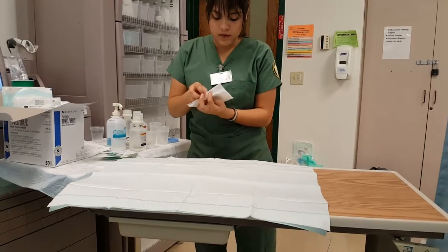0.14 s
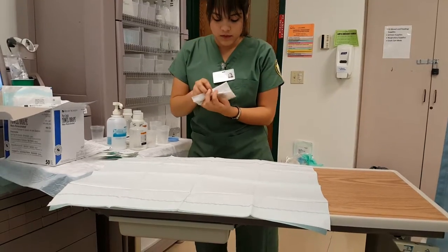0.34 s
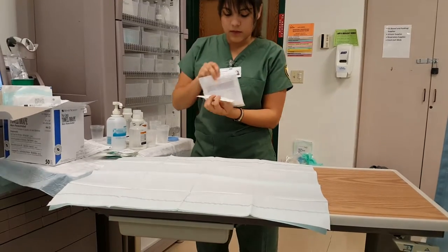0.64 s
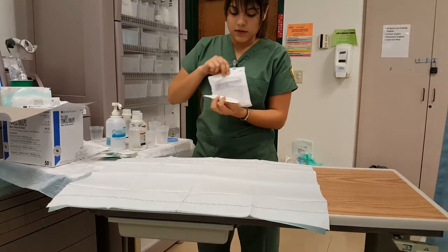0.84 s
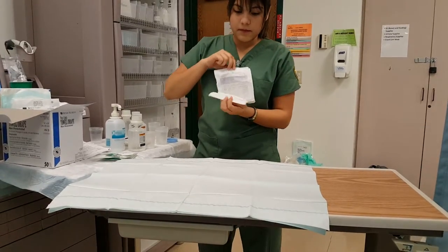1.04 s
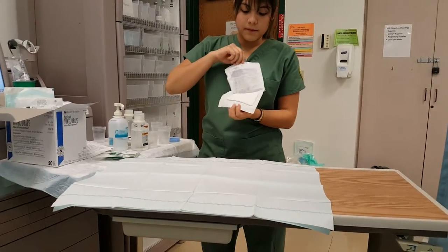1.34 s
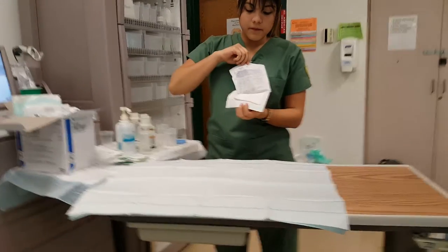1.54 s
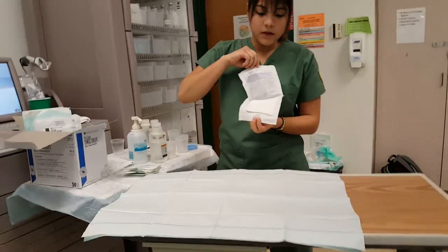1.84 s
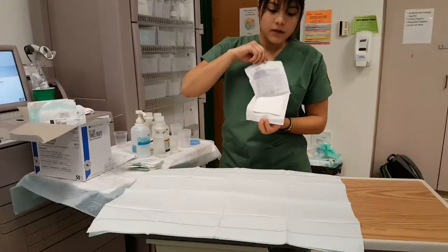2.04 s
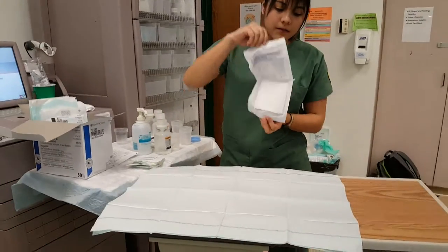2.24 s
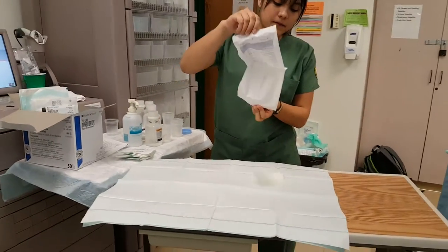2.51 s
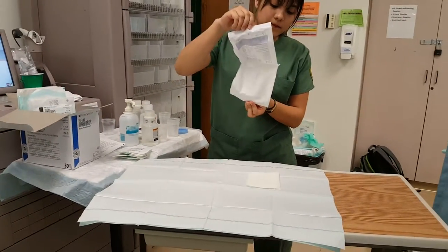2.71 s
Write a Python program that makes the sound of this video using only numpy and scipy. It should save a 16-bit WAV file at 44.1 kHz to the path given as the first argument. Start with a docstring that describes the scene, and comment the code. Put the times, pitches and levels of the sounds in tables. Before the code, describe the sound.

A paper packet is peeled open with fine crinkling, glue ticks and sharp crease snaps in bursts, then its light contents drop softly onto a covered table; small room, faint ventilation, stereo microphone a couple of metres away.

```python
"""Small room, a couple of metres from a covered table: a paper packet is peeled open by hand.
Creases snap as noise bursts with facet rings; glue parts in thin ticks; panels flex as decaying noise.
Clumped sine grains and noise make the fine crinkle; the contents land as a low decaying sine plus rustle.
Filtered noise and wavering sines make the ventilation; random echoes and a short tail make the room."""
import sys
import numpy as np
from scipy import signal
from scipy.fft import rfft, irfft, next_fast_len
from scipy.io import wavfile
from scipy.ndimage import map_coordinates

SR = 44100
rng = np.random.default_rng(int(sys.argv[2]) if len(sys.argv) > 2 else 0)


def unload_audio(sound):
    """Save the sound as a 16-bit wav file, at the path given as the first command line argument."""
    columns = np.transpose(np.atleast_2d(sound))
    # keep every value between -1 and 1, then stretch to whole-number steps
    steps = np.round(np.clip(columns, -1, 1) * 32767)
    wavfile.write(sys.argv[1], SR, steps.astype(np.int16))


N = 126567
TOP_HZ = 16000


def amp(db):
    """Amplitude factor of a level in dB."""
    return 10 ** (np.asarray(db) / 20)


def unit(x):
    """Scale to rms 1 over all channels."""
    return x / np.sqrt(np.mean(x ** 2) + 1e-20)


def along(points, hz):
    """Interpolate (hz, value) points on a log frequency axis."""
    point_hz, value = np.transpose(points)
    return np.interp(np.log(hz + 1), np.log(point_hz + 1), value)


def curve(points):
    """Interpolate (time_s, value) points, one value per sample."""
    return np.interp(np.arange(N) / SR, *np.transpose(points))


def wobble(knots_per_s):
    """Smooth random curve through normally distributed knots."""
    knots = rng.standard_normal(int(N * knots_per_s / SR) + 4)
    return map_coordinates(knots, [np.arange(N) * knots_per_s / SR])


def low_shelf(hz, corner_hz):
    """1 below the corner, 0 above."""
    return 1 / (1 + (hz / corner_hz) ** 4)


def high_shelf(hz, corner_hz):
    """0 below the corner, 1 above."""
    return 1 - 1 / (1 + (hz / corner_hz) ** 6)


def coloured(x, db_at):
    """Causal minimum-phase filter with gain db_at(hz), built by folding the cepstrum."""
    n = x.shape[-1]
    m = 2 * next_fast_len(n)
    gain = amp(db_at(np.fft.rfftfreq(m, 1 / SR)))
    cepstrum = irfft(np.log(gain + 1e-6), m)
    cepstrum[..., 1:m // 2] *= 2
    cepstrum[..., m // 2 + 1:] = 0
    response = np.exp(rfft(cepstrum))
    return irfft(rfft(x, m) * response, m)[..., :n]


def stereo(pair, width):
    """Left and right from two unrelated signals taken as mid and side."""
    mid = pair[0]
    side = coloured(pair[1], lambda hz: along(width, hz))
    return np.array([mid + side, mid - side])


def add(track, start_s, sound):
    """Mix a sound into the track, cut at the track's end."""
    i = max(0, round(start_s * SR))
    part = track[:, i:i + sound.shape[1]]
    part += sound[:, :part.shape[1]]


# air noise spectrum, relative: hz, density_db_per_hz
AIR_SPECTRUM = [(15, -26), (30, -15), (56, -3), (80, -4), (120, 2), (190, 0), (310, -8.5), (480, -12),
                (610, -19.5), (730, -13), (1000, -23.5), (2500, -29.5), (6000, -40), (15500, -46.5)]
# air stereo width: hz, side_over_mid_db
AIR_WIDTH = [(60, -16.5), (150, -17), (320, -8.5), (3000, 1.5)]
# fan and motor lines: pitch_hz, level_db
HUM_LINES = [(117, -52), (240, -61.5), (273, -65), (541, -60)]
AIR_DB = -48.5
HUM_WAVER_DB, HUM_DRIFT_HZ = 1.5, 2.23


def ventilation():
    """Duct rumble and faint hiss, with slightly unsteady fan and motor lines."""
    noise = stereo(rng.standard_normal((2, N)), AIR_WIDTH)
    air = unit(coloured(noise, lambda hz: along(AIR_SPECTRUM, hz)))
    hum = np.zeros(N)
    for pitch_hz, level_db in HUM_LINES:
        level = amp(level_db + HUM_WAVER_DB * wobble(4.83))
        cycles = np.cumsum(pitch_hz + HUM_DRIFT_HZ * wobble(6)) / SR
        hum += level * np.sqrt(2) * np.sin(2 * np.pi * cycles)
    return amp(AIR_DB) * air + hum


# tail colour: hz, gain_db
ROOM_COLOUR = [(200, 0), (2000, -4), (6000, -12.5), (15000, -7.5)]
ROOM_T60_S, ROOM_ONSET_S = 0.2, 0.0026
EARLY_DB, EARLY_DECAY_S = -9.5, 0.012


def room_response(size=256):
    """Early echoes from table and cabinets, then a short, dull tail."""
    hz, time_s, z = signal.stft(rng.standard_normal((2, SR // 2)), SR, nperseg=size)
    gain = amp(along(ROOM_COLOUR, hz))[:, None] * np.sqrt(2 * np.log(1000) / (ROOM_T60_S * SR))
    decay = amp(-60 * time_s / ROOM_T60_S)
    tail = signal.istft(z * gain * decay, SR, nperseg=size)[1]
    t = np.arange(tail.shape[1]) / SR
    onset = 1 - np.exp(-(t / ROOM_ONSET_S) ** 2)
    spiky = rng.standard_normal(tail.shape) ** 3  # cubing makes a few echoes stand out
    early = spiky * onset * np.exp(-t / EARLY_DECAY_S)
    early /= np.linalg.norm(early, axis=1, keepdims=True)
    return onset * tail + amp(EARLY_DB) * early


def room(x, count=14):
    """Echoes of the paper; the pattern is redrawn for each equal stretch as the hands move."""
    out = np.zeros((2, N))
    for part in np.array_split(np.arange(N), count):
        echoes = signal.fftconvolve(x[:, part], room_response(), axes=1)
        add(out, part[0] / SR, echoes)
    return out


# paper colour, relative: hz, density_db_per_hz
PAPER_SPECTRUM = [(100, -22), (300, -6.5), (520, -6.5), (780, 0), (1200, -5.5), (1600, -2.5), (2200, 0.5),
                  (2800, -4), (3500, -0.5), (4600, -3), (5700, -2.5), (7500, -7.5), (10000, -8),
                  (15500, -16)]


def paper_db(hz):
    """Spectral colour of noise from the stiff sheet."""
    return along(PAPER_SPECTRUM, hz)


# packet stereo width: hz, side_over_mid_db
PAPER_WIDTH = [(300, -21.5), (1500, -9.5), (5000, -6), (15000, -5)]


def paper_stereo(pair):
    """Spread two unrelated signals over the packet's stereo width."""
    return stereo(pair, PAPER_WIDTH)


LAND_START_S, LAND_RISE_S, LAND_DECAY_S = 2.592, 0.0034, 0.02
PUSH_HZ, PUSH_DB, LAND_RUSTLE_DB = 128, -38, -43.5  # levels before the envelope


def landing():
    """The flat, light contents push out a puff of air and brush the table cover."""
    t = np.maximum(np.arange(N) / SR - LAND_START_S, 0)
    shape = (1 - np.exp(-t / LAND_RISE_S)) * np.exp(-t / LAND_DECAY_S)
    push = np.sin(2 * np.pi * PUSH_HZ * t)
    rustle = unit(coloured(paper_stereo(rng.standard_normal((2, N))), paper_db))
    return shape * (amp(PUSH_DB) * push + amp(LAND_RUSTLE_DB) * rustle)


# crinkle level under the fingers: time_s, level_db
CRINKLE_LEVEL = [(0, -52.5), (.13, -52), (.3, -58.5), (.45, -52), (.57, -58), (.68, -60), (.78, -55.5),
                 (.98, -53), (1.05, -69), (1.24, -57.5), (1.36, -40.5), (1.46, -81), (2.1, -62),
                 (2.26, -58), (2.33, -43.5), (2.47, -80)]
CRINKLES_PER_S, CRINKLE_SPREAD_DB, CLUMP_DB = 600, 6.5, 3.5
CRINKLE_HZ, CRINKLE_SPREAD_OCTAVES, CRINKLE_DECAY_CYCLES = 2350, 0.55, 3.2
FIZZ_DB = -2  # against the facets


def crinkle(size=512):
    """Tiny facets flick in clumps, each with its own brief pitch, over the fizz of parting fibres."""
    hits = np.flatnonzero(rng.random(N) < CRINKLES_PER_S / SR)
    pitch, strength, mid, side = rng.standard_normal((4, len(hits), 1))
    hz = np.clip(CRINKLE_HZ * 2 ** (CRINKLE_SPREAD_OCTAVES * pitch), None, TOP_HZ)
    cycles = hz * np.arange(size) / SR
    level = amp(CRINKLE_SPREAD_DB * 2 * np.tanh(strength / 2))
    grains = level * np.sin(2 * np.pi * cycles) * np.exp(-cycles / CRINKLE_DECAY_CYCLES)
    where = (hits[:, None] + np.arange(size)).ravel()
    # random polarity in mid and side scatters the grains between left and right
    facets = np.array([np.bincount(where, (grains * np.sign(w)).ravel(), N + size)[:N]
                       for w in (mid, side)])
    flutter = amp(CRINKLE_SPREAD_DB * wobble(400))
    fizz = coloured(rng.standard_normal((2, N)) * flutter, paper_db)
    clumps = amp(CLUMP_DB * np.tanh(wobble(70.42)))
    texture = paper_stereo(unit(facets) + amp(FIZZ_DB) * unit(fizz))
    return amp(curve(CRINKLE_LEVEL)) * unit(clumps * texture)


# freed panels: start_s, level_db (before the decay)
PANEL_FLEXES = [(1.105, -47), (1.206, -37.5)]
FLEX_HZ, FLEX_HALF_WIDTH_OCTAVES, FLEX_DECAY_S = 1600, 0.7, 0.018


def flex_band_db(hz):
    """Midrange band-pass."""
    octaves = np.log2((hz + 1) / FLEX_HZ)
    return -10 * np.log10(1 + (octaves / FLEX_HALF_WIDTH_OCTAVES) ** 8)


def flexes(size=8192):
    """A panel straightens after its crease has snapped: a ragged midrange rustle that dies away."""
    out, t = np.zeros((2, N)), np.arange(size) / SR
    for start_s, level_db in PANEL_FLEXES:
        raggedness = amp(CLUMP_DB * wobble(CRINKLES_PER_S)[:size])
        ragged = rng.standard_normal((2, size)) * raggedness
        rustle = unit(coloured(paper_stereo(ragged), flex_band_db))
        add(out, start_s, amp(level_db) * np.exp(-t / FLEX_DECAY_S) * rustle)
    return out


ATTACK_S, TREBLE_HZ = 0.00048, 7060
LEVEL_WINDOW_S = 0.0042  # tick and snap levels: rms with all energy packed into this time


def burst_db(hz, treble_db):
    """Paper colour with more or less treble."""
    return paper_db(hz) + treble_db * high_shelf(hz, TREBLE_HZ)


def at_level(x, level_db):
    """Scale a short burst so its energy gives level_db over LEVEL_WINDOW_S."""
    return amp(level_db) * unit(x) * np.sqrt(LEVEL_WINDOW_S * SR / x.shape[-1])


# glued seam: start_s, level_db, extra_treble_db
GLUE_TICKS = [(0.0235, -43, 3), (0.0325, -42, 4), (0.139, -43.5, 3), (0.1823, -43, 4), (0.245, -40.5, 9),
              (0.2585, -41.5, 2), (0.326, -45, 12), (0.3483, -44, -4), (0.4475, -43, 5), (0.465, -43, 4),
              (0.629, -46.5, -20), (0.7444, -44.5, -16), (0.7737, -43, -16), (0.875, -43.5, 4),
              (0.945, -44, -12), (1.2175, -40.5, -8), (1.2475, -43, -16), (1.2655, -38, 4),
              (1.307, -39.5, 0), (2.027, -48.5, -15), (2.22, -44.5, -20), (2.3825, -43.5, 1),
              (2.4238, -39.5, 5), (2.524, -49.5, -11)]
TICK_DECAY_S, TICK_LOW_HZ, TICK_LOW_DB = 0.0013, 850, -20
TICK_DULL_HZ, TICK_DULL_DB = 3100, -4  # the soft glue damps the upper range


def tick_thinning_db(hz):
    """Bass cut and glue damping."""
    return TICK_DULL_DB * high_shelf(hz, TICK_DULL_HZ) + TICK_LOW_DB * low_shelf(hz, TICK_LOW_HZ)


def ticks(size=1024):
    """Each spot of glue parts with a thin click that rings nothing."""
    out, t = np.zeros((2, N)), np.arange(size) / SR
    shape = (1 - np.exp(-t / ATTACK_S)) * np.exp(-t / TICK_DECAY_S)
    for start_s, level_db, treble_db in GLUE_TICKS:
        noise = paper_stereo(shape * rng.standard_normal((2, size)))
        tick = coloured(noise, lambda hz: burst_db(hz, treble_db) + tick_thinning_db(hz))
        add(out, start_s, at_level(tick, level_db))
    return out


RING_DB, RING_DECAY_S = -7, 0.0022  # level against the burst, at CRINKLE_HZ
RING_DB_PER_OCTAVE = 1.6  # small, high facets radiate better


def facet(hz, t):
    """Brief ring of one flipping facet, against a burst of rms 1."""
    shape = (1 - np.exp(-t / ATTACK_S)) * np.exp(-t / RING_DECAY_S)
    ring = shape * np.sin(2 * np.pi * (hz * t + rng.random()))
    return amp(RING_DB + RING_DB_PER_OCTAVE * np.log2(hz / CRINKLE_HZ)) * unit(ring)


BEND_DELAY_S = 0.000899  # at 1 kHz


def dispersed(x):
    """Bending waves cross the sheet treble first: delay falls with the root of frequency."""
    hz = np.fft.rfftfreq(x.shape[-1], 1 / SR)
    delay_s = BEND_DELAY_S * np.sqrt(1000 / np.maximum(hz, hz[1]))
    phase = 2 * np.pi * np.cumsum(delay_s - delay_s[-1]) * hz[1]
    return irfft(rfft(x) * np.exp(-1j * phase), x.shape[-1])


# buckling creases: start_s, level_db, extra_bass_db, extra_treble_db, ring_hz of each flipping facet
CREASE_SNAPS = [(0.0045, -33.5, -1, 10, 3500), (0.0572, -26.8, -6, 6, 1030, 2160, 4250, 4400),
                (0.115, -39, -7, -7, 2050), (0.4009, -38.5, -15, 3, 3300), (0.4974, -37.5, -9, 4, 3230),
                (0.5375, -31.5, 6, -1, 2050, 2200), (0.542, -32.5, -3, 5, 5800), (0.553, -38, -1, -8, 2230),
                (0.564, -35.5, 9, 5, 2100), (0.571, -38.5, 10, -4, 1400), (0.7643, -41, 0, -14, 2230),
                (0.8119, -37.5, 2, -8, 1500), (0.893, -43, 9, -19, 1570), (0.955, -37, -2, -5, 2330),
                (0.9892, -38.5, -12, 3.5, 2340), (1.1021, -35.3, -2, 2.5, 2280, 5600),
                (1.1715, -38.5, 6, -4, 2260), (1.2036, -25.6, 0, 6, 900, 1480, 4100),
                (1.288, -32, -5, -12, 2950), (1.3171, -29.5, -7, 3, 5660), (1.3225, -32.7, 1, 9, 2220),
                (1.3515, -32, 0, 0, 2050), (1.3565, -29.5, 7, 3.5, 2300), (1.383, -33.5, -2, 5, 8450),
                (1.4, -32, 3, -4, 2710), (1.5638, -33.5, 3, -5, 760, 3800),
                (1.5668, -23.3, -6, 2.5, 760, 5100, 5650, 5750), (1.575, -38, 3, 2, 2100),
                (1.5995, -34, 7, 6, 1590), (1.6072, -24.3, -3, 1, 3400, 5780), (1.93, -35.3, -7, -11, 2730),
                (2.121, -37.5, 0, -7.5, 2590), (2.169, -35, 1, -6, 2570), (2.1743, -30, 3, 3, 1960),
                (2.2792, -25.7, -1, 1, 1900, 2500), (2.2863, -31, 3, -7, 2420), (2.292, -28.5, 8, 14, 4950),
                (2.306, -36.5, -1, 1, 5640), (2.3325, -30.3, 5, 2, 3700), (2.3368, -30.3, 2, 2, 1650, 1830),
                (2.3505, -28.5, -15, 0, 3580), (2.4135, -40, 11, -16, 3550)]
SNAP_DECAY_S, FLUTTER_DECAY_S, FLUTTER_DB = 0.0015, 0.0055, -15.5
BASS_HZ = 1510


def snaps(size=2048):
    """Each crease gives way in a millisecond burst that rings one or a few facets of the sheet."""
    out, t = np.zeros((2, N)), np.arange(size) / SR
    decay = np.exp(-t / SNAP_DECAY_S) + amp(FLUTTER_DB) * np.exp(-t / FLUTTER_DECAY_S)
    shape = (1 - np.exp(-t / ATTACK_S)) * decay
    for start_s, level_db, bass_db, treble_db, *rings_hz in CREASE_SNAPS:
        noise = paper_stereo(shape * rng.standard_normal((2, size)))
        burst = coloured(noise, lambda hz: burst_db(hz, treble_db) + bass_db * low_shelf(hz, BASS_HZ))
        rings = sum(facet(hz, t) for hz in rings_hz)
        snap = dispersed(unit(burst) + rings)
        add(out, start_s, at_level(snap, level_db))
    return out


# stereo balance: hz, left_minus_right_db
BALANCE = [(300, -1), (1200, 0.5), (2700, 0), (4200, -4.5), (6400, -4), (9800, -0.5), (12500, 4.5),
           (15000, 11.5)]
# stereo lag: time_s, left_behind_right_us
LAG = [(0, -43), (2.3, 15)]


def scene():
    """The packet, direct and off the walls, over ventilation; left first leads, later trails right."""
    paper = landing() + crinkle() + flexes() + ticks() + snaps()
    half_lag = curve(LAG) * SR / 2e6  # samples
    direct = np.array([map_coordinates(channel, [np.arange(N) - sign * half_lag], order=5)
                       for channel, sign in zip(paper, (1, -1))])
    heard = coloured(direct + room(paper), lambda hz: np.outer([1, -1], along(BALANCE, hz)) / 2)
    return ventilation() + heard


def record(dry):
    """Sharp low-pass: nothing remains from TOP_HZ upwards."""
    m = next_fast_len(N + SR // 2)
    keep = np.fft.rfftfreq(m, 1 / SR) < TOP_HZ
    return irfft(rfft(dry, m) * keep, m)[:, :N]


dry = scene()
out = record(dry)
unload_audio(out)
```